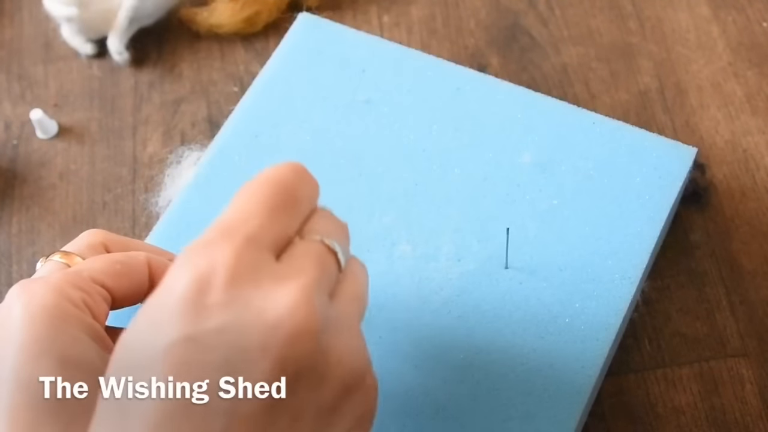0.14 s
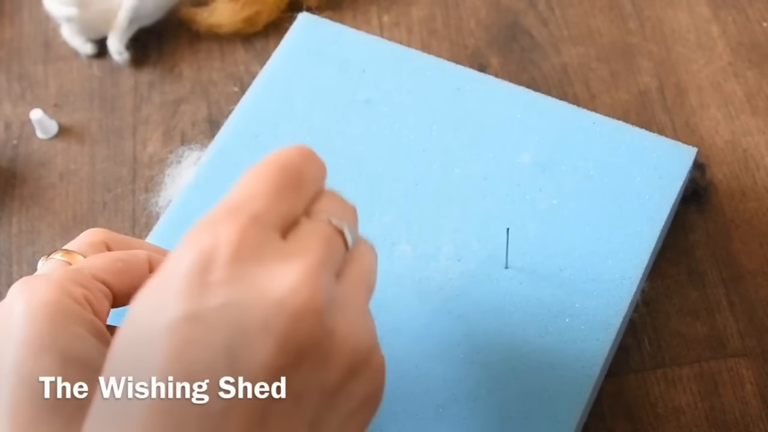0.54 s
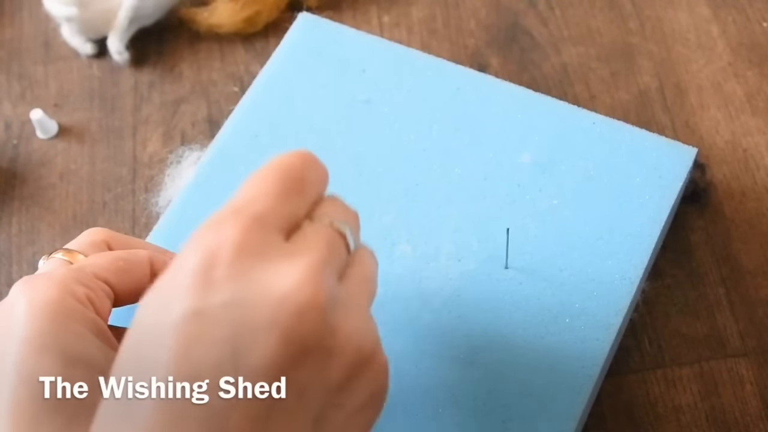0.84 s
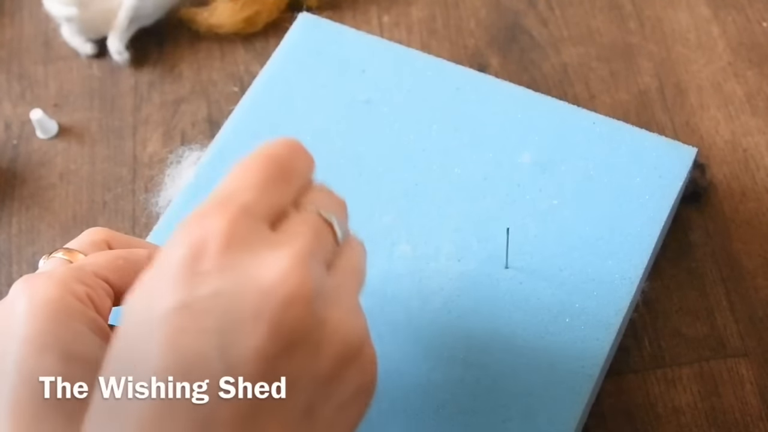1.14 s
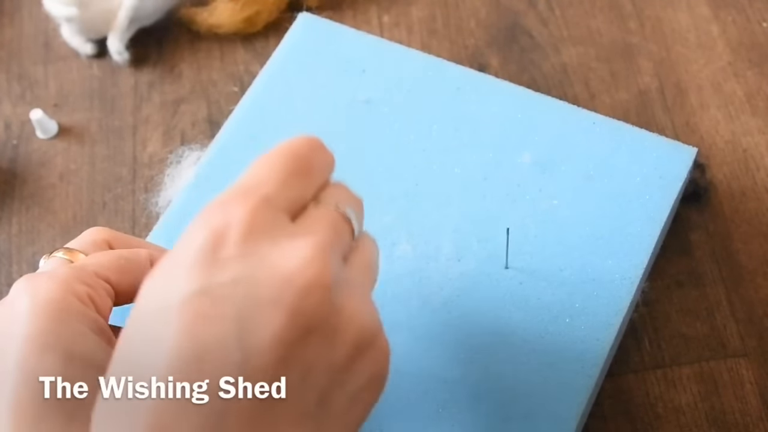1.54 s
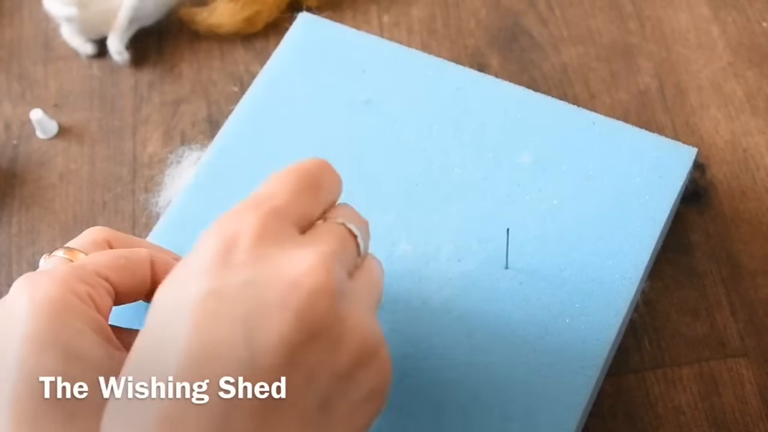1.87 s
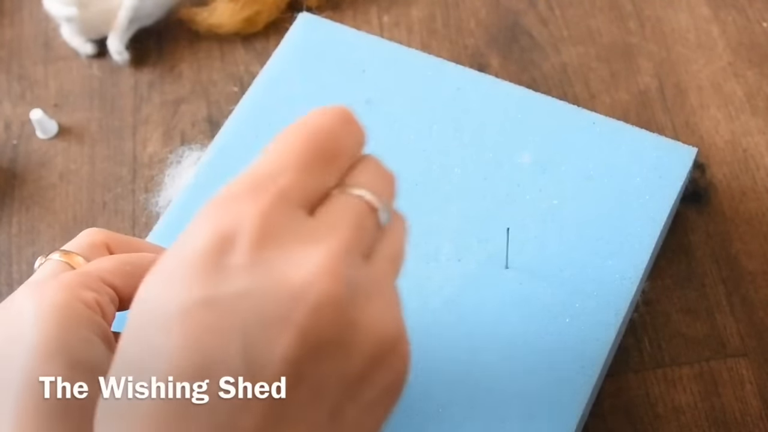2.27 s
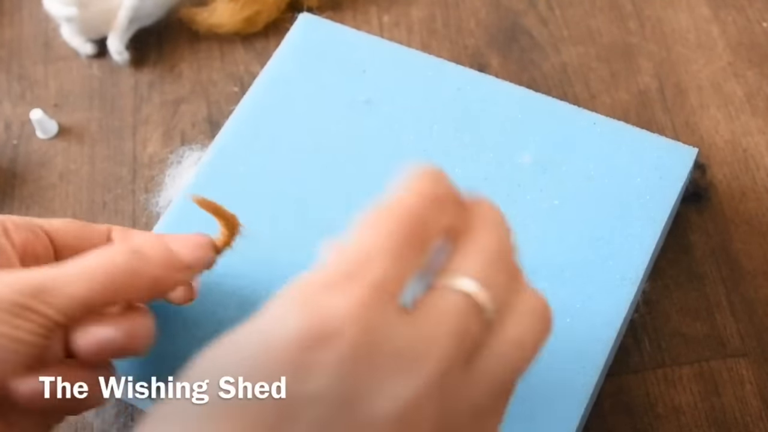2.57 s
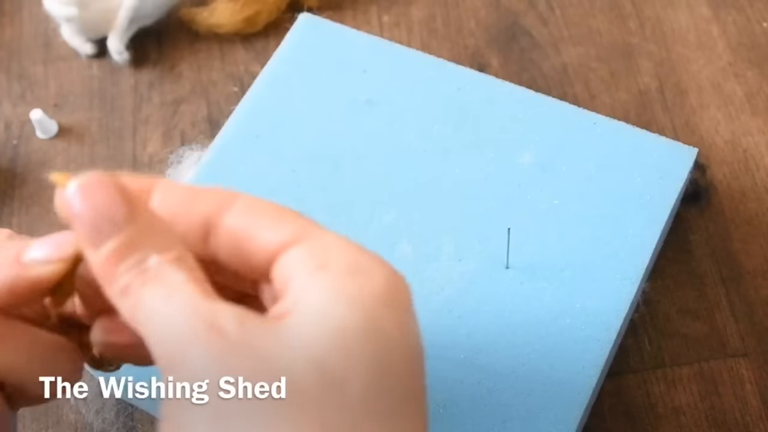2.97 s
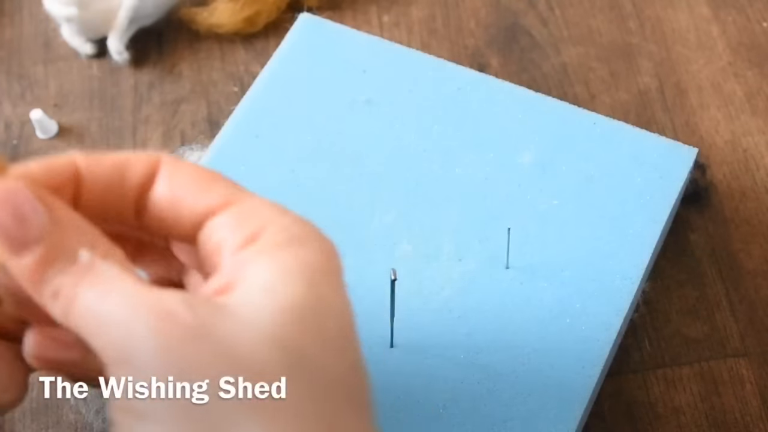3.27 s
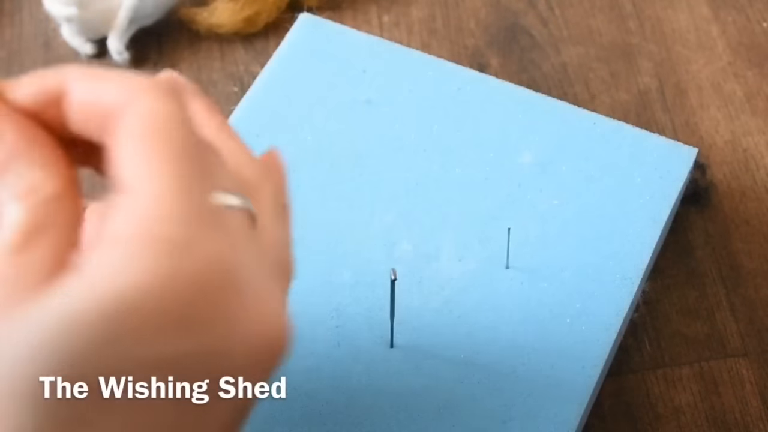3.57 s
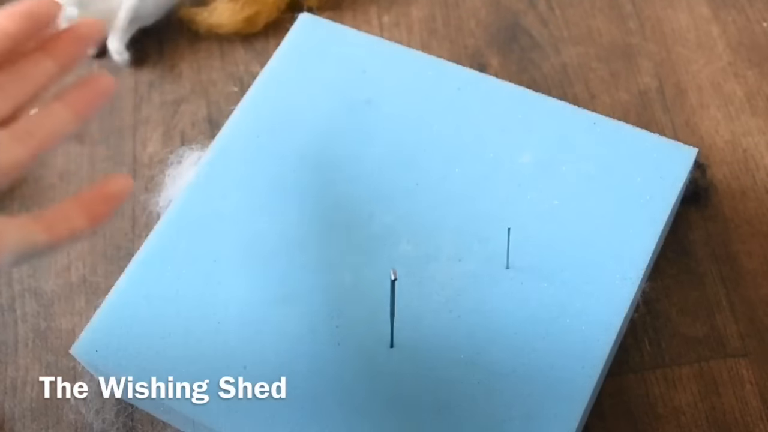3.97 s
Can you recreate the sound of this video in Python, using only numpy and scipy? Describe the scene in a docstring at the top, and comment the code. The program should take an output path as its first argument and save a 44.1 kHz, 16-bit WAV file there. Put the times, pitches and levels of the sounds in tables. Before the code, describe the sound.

Close in a small quiet room with steady soft hiss, a barbed needle jabs wool on a foam pad about six times a second, each a dry fibrous crunch with a dull thud. It is then stuck into bare foam with a louder crunch; a ring taps, fingers rub and squeak faintly, and palms brush.

```python
"""Quick dry jabs, about six a second: a barbed felting needle in wool on a foam pad, over a steady hiss.
Tearing fibres are bursts of tiny random clicks that thud the pad and ring the needle through resonances.
The needle is then parked with a crunch and a fizz deep in the foam; fingers and palms rub the wool as dense
crackles, with a thin squeak, a finger ring's tap and small clicks of decaying noise or sines.
Hands bump the table softly until shortly after the parking; a small quiet room adds a tail of decaying noise."""
import sys
import numpy as np
from scipy import signal
from scipy.fft import rfft, irfft
from scipy.io import wavfile

SR = 44100
rng = np.random.default_rng(int(sys.argv[2]) if len(sys.argv) > 2 else 0)


def ratio_of_db(decibels):
    """Turn decibels (scalar or array-like) into linear amplitude factors; 0 dB maps to 1."""
    return 10 ** (np.asarray(decibels, float) / 20)


def master(y):
    """Save y as 16-bit WAV."""
    cut = np.clip(np.atleast_2d(y).T, -1, 1)
    pcm = np.round(cut * 32767)  # scale
    wavfile.write(sys.argv[1], SR, pcm.astype(np.int16))


N = 181251

# The barbs that catch hardest. Each row: time in seconds, peak of the pad thud in dB, peak of the needle tick in dB.
HARD_SNAGS = [(0.0868, -23, -29), (0.1018, -31.5, -40), (0.2476, -39, -39), (0.2593, -43, -24.5),
              (.411, -29.5, -36), (0.43, -46, -37), (.543, -33.5, -31.5), (.556, -39.5, -48),
              (0.7175, -23, -38), (.868, -34.5, -44.5), (1.0627, -24.5, -37), (1.0787, -39, -32),
              (1.2448, -27, -42), (1.2529, -26.5, -27), (1.409, -39, -40), (1.4234, -29.5, -29.5),
              (1.5624, -37, -54), (1.751, -38, -34), (1.77, -41, -36), (1.9192, -28, -46),
              (1.931, -24, -22.5), (2.0717, -33.5, -46), (2.079, -30, -38.5), (2.0945, -31.5, -34),
              (2.231, -37, -60), (2.238, -34.5, -40), (2.4878, -35, -25), (2.4922, -29.5, -26),
              (2.504, -35, -22), (2.517, -39, -24), (2.5248, -45, -33)]
PARK_S = 2.4  # snags after this many seconds are in bare foam


def ring(x, hz, width):
    """Two-pole band-pass resonance, gain 1 at its centre; centre and width in Hz."""
    centre = min(hz, 0.45 * SR)
    quality = hz / min(width, 0.4 * SR)
    return signal.lfilter(*signal.iirpeak(centre, quality, SR), x)


def body(x, modes):
    """Sum of soft-onset resonances, scaled so that white noise keeps its level; also returns a unit click's peak."""
    def shape(v):
        total = 0
        for k, (hz, width, db) in enumerate(modes):
            # rung twice for a soft onset; 1.55 makes up for the narrowing
            twice = ring(ring(v, hz, 1.55 * width), hz, 1.55 * width)
            total = total + (-1) ** k * ratio_of_db(db) * twice
        return total

    response = shape(signal.unit_impulse(4096))
    noise_gain = np.sqrt(np.sum(response ** 2))
    return shape(x) / noise_gain, np.abs(response).max() / noise_gain


def crackle(rate, spread_db, smooth):
    """Random clicks of uneven size, rate per second, over a share of smooth noise; rms about 1."""
    when = rng.random(N)
    sign = np.sign(rng.standard_normal(N))
    size = np.minimum(rng.exponential(size=N), 2.5)
    x = (when < rate / SR) * sign * ratio_of_db(spread_db * size)
    x = x / np.sqrt(np.mean(x ** 2)) + smooth * rng.standard_normal(N)
    return x / np.sqrt(1 + smooth ** 2)


def curves(rows):
    """Gains drawn through the columns after the first, straight in dB, silent outside the rows' times."""
    t = np.arange(N) / SR
    s, *columns = np.transpose(rows)
    inside = (t >= s[0]) * (t <= s[-1])
    return [ratio_of_db(np.interp(t, s, db)) * inside for db in columns]


def lag(x, seconds):
    """One-pole smoothing: follows late and dies slowly."""
    keep = np.exp(-1 / (max(seconds, 1e-4) * SR))
    return signal.lfilter([1 - keep], [1, -keep], x)


def fade(t, t60):
    """Exponential decay by 60 dB in t60 seconds."""
    return np.exp(-np.log(1000) * t / t60)


def air():
    """Room tone and microphone hiss: steady noise coloured by a fixed spectrum."""
    # Each row: frequency in Hz, density in dB per Hz before the whole is set to its level.
    spectrum = [(15, -49), (25, -21), (91, -6), (161, -7.5), (200, -5.5), (352, -6), (542, -6), (587, -8),
                (5820, -16.5), (15800, -27)]
    level_db = -58.5  # rms
    hz, db = np.transpose(spectrum)
    f = np.maximum(np.fft.rfftfreq(N, 1 / SR), 1)
    colour = ratio_of_db(np.interp(np.log(f), np.log(hz), db))
    x = irfft(rfft(rng.standard_normal(N)) * colour, N)
    return ratio_of_db(level_db) * x / np.sqrt(np.mean(x ** 2))


def room(x):
    """Diffuse tail of decaying noise that swells in over 10 ms; the treble dies sooner."""
    level_db, t60_low_s, t60_high_s = -13, 0.38, 0.33
    t = np.arange(SR // 2) / SR
    noise = rng.standard_normal(len(t))
    low = signal.lfilter(*signal.butter(1, 2000, fs=SR), noise)
    tail = low * ratio_of_db(-60 * t / t60_low_s) + (noise - low) * ratio_of_db(-60 * t / t60_high_s)
    tail *= np.clip(t / 0.01, 0, 1)
    tail /= np.sqrt(np.sum(tail ** 2))
    return ratio_of_db(level_db) * signal.fftconvolve(x, tail)[:N]


def bumps():
    """Soft dull knocks of the working hands: a sparse crackle in one table resonance, until the hands lift."""
    level_db, rate, hands_off_s = -71.5, 25, 3.2  # knocks per second
    on = np.arange(N) / SR < hands_off_s
    knocks = crackle(rate, spread_db=4.5, smooth=0.24) * on
    return ratio_of_db(level_db) * body(knocks, [(151, 110, 0)])[0]  # centre and width in Hz, dB


def clicks():
    """Small hard or dry clicks away from the pad: decaying noise through one broad resonance each."""
    # Each row: start in seconds, peak in dB, centre in Hz, time in seconds for its noise to fall 60 dB.
    ticks = [(0.501, -45.5, 9000, 0.0086), (.612, -45, 4000, .008), (0.627, -47, 7500, .01),
             (0.954, -46, 8000, .012), (1.636, -44, 8400, 0.022), (2.106, -40, 8000, 0.0074),
             (2.712, -45, 9900, 0.032), (3.62, -48, 13500, .008), (3.638, -48, 14000, .01),
             (3.8702, -38, 9800, 0.011), (3.883, -44, 8000, .006)]
    out, t = np.zeros(N), np.arange(SR // 4) / SR
    for s, db, hz, t60 in ticks:
        tick = ring(rng.standard_normal(len(t)) * fade(t, t60), hz, 0.38 * hz)
        i = int(s * SR)
        out[i:i + len(t)] += (ratio_of_db(db) * tick / np.abs(tick).max())[:N - i]
    return out


def ring_tap():
    """A finger ring taps something hard: a sum of decaying sine modes."""
    # Each row: frequency in Hz, relative level in dB, time in seconds to fall 60 dB.
    modes = [(164, -16.5, 0.1), (1055, -11.5, 0.05), (2370, -9, 0.027), (3900, -3.5, 0.013),
             (4130, -20, .2), (6500, -1, 0.021), (8900, -3, .008), (9800, -3.5, 0.019), (10600, -14, .07),
             (11500, -2, 0.0091), (13500, -13, .008)]
    start_s, peak_db = 3.1436, -25.5
    out, t = np.zeros(N), np.arange(SR // 4) / SR
    tap = sum(ratio_of_db(db) * fade(t, t60) * np.sin(2 * np.pi * hz * t) for hz, db, t60 in modes)
    i = int(start_s * SR)
    out[i:i + len(t)] += ratio_of_db(peak_db) * tap / np.abs(tap).max()
    return out


def rubbing(gain, rings, rate):
    """A very dense crackle in fixed resonances, as when fibres slip past skin or steel."""
    return body(crackle(rate, spread_db=-3.0, smooth=0.42) * gain, rings)[0]


def palms():
    """Palms slide on the wool: the densest of the rubbing crackles."""
    # Each row: time in seconds, level in dB.
    slide = [(3.84, -66), (3.88, -58.5), (3.945, -51), (3.97, -58.5), (4.005, -56), (4.04, -48.5),
             (4.08, -49), (4.095, -66), (4.11, -75)]
    # Each row: resonance in Hz, width in Hz, relative level in dB.
    rings = [(5050, 2300, -1.5), (8700, 2800, 0.5), (14000, 3000, -7), (2960, 2200, -4.5)]
    return rubbing(*curves(slide), rings, rate=12000)


def fingers():
    """Fingers slide on the wool: a rubbing crackle with a brighter set of resonances."""
    # Each row: time in seconds, level in dB.
    slide = [(3.146, -46), (3.18, -61), (3.21, -54), (3.235, -47), (3.245, -52), (3.26, -46.5),
             (3.288, -53.5), (3.297, -66), (3.33, -72)]
    # Each row: resonance in Hz, width in Hz, relative level in dB.
    rings = [(3600, 1600, -9), (9500, 930, 3.5), (12300, 780, -16), (14400, 300, -9), (8000, 10000, -5)]
    return rubbing(*curves(slide), rings, rate=4000)


def squeak():
    """Fibres twist tight: a gliding pitch and its octave, each fluttering like narrow-band noise."""
    # Each row: time in seconds, pitch in Hz, level of the lower partial in dB.
    glide = [(3.19, 3900, -68), (3.23, 3900, -60), (3.265, 3820, -54.5), (3.29, 3810, -52),
             (3.315, 3820, -64)]
    octave_db, width_hz = -2.5, 60
    t = np.arange(N) / SR
    s, hz, _ = np.transpose(glide)
    phase = 2 * np.pi * np.cumsum(np.interp(t, s, hz)) / SR
    flutter = signal.lfilter(*signal.butter(1, width_hz / 2, fs=SR), rng.standard_normal((4, N)))
    flutter /= flutter.std()
    first = flutter[0] * np.cos(phase) + flutter[1] * np.sin(phase)
    octave = flutter[2] * np.cos(2 * phase) + flutter[3] * np.sin(2 * phase)
    # the octave stops one row before the lower partial
    octave *= t < s[-2]
    return curves(glide)[1] * (first + ratio_of_db(octave_db) * octave)


def needle(gains, snags, bodies, rate, spread_db, smooth, fray_s):
    """Tearing fibres and hard snags push the pad down and tick the needle."""
    tear = crackle(rate, spread_db, smooth)
    # each catch pushes the pad once, but frays on the needle for a moment as several fibres part
    decay = np.exp(-1 / (fray_s * SR))
    power = signal.lfilter([np.sqrt(1 - decay ** 2)], [1, -decay], tear ** 2)
    fraying = np.sqrt(power) * rng.standard_normal(N)
    fraying /= fraying.std()

    start, t = (snags[:, 0] * SR).astype(int), np.arange(128) / SR
    pushes = -signal.unit_impulse(len(t)) * np.ones((len(snags), 1))
    frays = pushes + rng.standard_normal(pushes.shape) * np.exp(-t / (2 * fray_s))
    frays /= np.sqrt(np.sum(frays ** 2, axis=1, keepdims=True))

    out = 0
    # the pad first, then the needle
    for column, gain, modes, shapes, drive in zip((1, 2), gains, bodies, (pushes, frays), (tear, fraying)):
        hits = np.zeros(N)
        np.add.at(hits, start[:, None] + np.arange(len(t)), shapes * ratio_of_db(snags[:, [column]]))
        struck, peak = body(hits, modes)
        out = out + struck / peak + body(drive * gain, modes)[0]
    return out


def needle_in_foam():
    """Needle parked in bare foam: crunch, a pad thud that dies more slowly, a late fizz as the cells burst."""
    # Each row: time in seconds, crunch level in dB.
    park = [(2.474, -60), (2.481, -50), (2.486, -33), (2.494, -32), (2.503, -36.5), (2.517, -33),
            (2.54, -43.5), (2.547, -46), (2.6, -65), (2.64, -78)]
    # Pressed pad, needle in foam, bursting cells. Each row: resonance in Hz, width in Hz, relative level in dB.
    pad, steel, cells = [(298, 300, -7), (550, 220, 3.5), (715, 220, -2), (1160, 440, -6.5)], [(1820, 255, 1), (2340, 127, 1.5), (3400, 860, 0),
                                              (5630, 700, -0.5), (8180, 1280, -4.5), (11000, 2300, -26)], [(12550, 1600, 10), (15000, 1500, -6)]
    # dB against the crunch, before the lag softens it
    thud_db, thud_lag_s, fizz_db, fizz_lag_s = -10, 0.0037, -11, 0.0085
    crunch, = curves(park)
    thud = ratio_of_db(thud_db) * lag(crunch, thud_lag_s)
    fizz = rubbing(ratio_of_db(fizz_db) * lag(crunch, fizz_lag_s), cells, rate=3300)
    snags = np.array(HARD_SNAGS)
    snags = snags[snags[:, 0] > PARK_S]
    return fizz + needle((thud, crunch), snags, (pad, steel), rate=1300, spread_db=1.5, smooth=0.3, fray_s=0.00048)


def strokes():
    """Each jab swells to its deepest push, sags, stops short; the pull-out rustles on more softly."""
    # Each row: deepest push in seconds, rise in seconds, stop in seconds after the deepest push,
    # pad thud in dB, fibre crunch in dB (both at the deepest push).
    jabs = [(-.01, .02, 0.021, -47, -56.5), (0.099, 0.038, 0.017, -41.5, -46),
            (.258, 0.033, 0.012, -37.5, -37), (.408, 0.027, 0.016, -36, -41),
            (0.546, 0.0032, 0.013, -42, -60), (0.72, 0.036, .019, -45.5, -59),
            (.87, .005, 0.0084, -51, -56.5), (1.064, .016, 0.02, -39, -36.5),
            (1.248, 0.023, .021, -38.5, -36.5), (1.425, 0.04, 0.015, -42.5, -43.5),
            (1.562, 0.0066, .0039, -44.5, -86), (1.755, .024, .018, -44.5, -46.5),
            (1.929, 0.023, 0.023, -39, -39), (2.086, 0.032, 0.023, -42.5, -49),
            (2.235, 0.043, 0.0065, -49.5, -54.5)]
    rise_db, stop_s, pull_s, pull_fade_s = -25, 0.004, 0.059, 0.025
    # fall from deepest push to stop; the pad is pressed early, so its thud falls further
    thud_sag_db, crunch_sag_db = -8, -4
    t, gains = np.arange(N) / SR, np.zeros((3, N))
    for s, rise, stop, thud_db, crunch_db in jabs:
        # the rustle follows 0.65 of a jab's dB above or below a middle one of -46 dB
        pull_db = -54.5 + 0.65 * ((thud_db + crunch_db) / 2 + 46)
        times = [-2 * rise, -rise, 0, stop, stop + stop_s]
        press, push = (ratio_of_db(np.interp(t - s, times, [-60, rise_db, 0, sag_db, -60]))
                       for sag_db in (thud_sag_db, crunch_sag_db))
        # linear shares of the pull-out level; the end values hold on as a faint floor
        pull = np.interp(t - s - stop, [-stop, 0, pull_s, pull_s + pull_fade_s], [0.0054, 0.83, 0.35, 0.0048])
        gains += ratio_of_db(np.array([[thud_db], [crunch_db], [pull_db]])) * np.array([press, push, pull])
    return gains


def needle_in_wool():
    """Jabs into wool: barbs tear fibres, thud the pad and ring the needle, then rustle out again."""
    # Pad, needle in wool, pull-out. Each row: resonance in Hz, width in Hz, relative level in dB.
    pad, steel, pull_rings = [(165, 133, -13.5), (409, 133, -2.5), (712, 233, 2), (1046, 136, -9),
                              (1286, 226, -2), (2276, 520, -13)], [(3050, 1200, -2.5), (4065, 650, -1), (5073, 690, 3.5),
                                           (7550, 890, -1), (8530, 1000, -7), (10960, 6600, -18.5),
                                           (5800, 8700, -17.5)], [(755, 820, 2.5), (1940, 1100, 2),
                                                                   (4180, 5200, -7), (7300, 7500, -15.5)]
    thud, crunch, pull = strokes()
    snags = np.array(HARD_SNAGS)
    snags = snags[snags[:, 0] <= PARK_S]
    jabbing = needle((thud, crunch), snags, (pad, steel), rate=1500, spread_db=4.0, smooth=0.43, fray_s=0.00069)
    return jabbing + rubbing(pull, pull_rings, rate=5000)


def scene():
    """Needle, hands and clicks in the room, over the steady hiss."""
    near = bumps() + clicks() + ring_tap()
    near += palms() + fingers() + squeak()
    near += needle_in_foam() + needle_in_wool()
    return (near + room(near) + air())[None]


def low_pass(x):
    """Removes everything above the highest recorded frequency."""
    return signal.sosfilt(signal.butter(12, 16440, fs=SR, output="sos"), x)


def record(dry):
    """A steep low-pass takes off the top above 15850 Hz."""
    steep = signal.ellip(10, 0.2, 60, 15850, fs=SR, output="sos")
    mix = signal.sosfilt(steep, dry)
    return low_pass(mix)


dry = scene()
out = record(dry)
master(out)
```